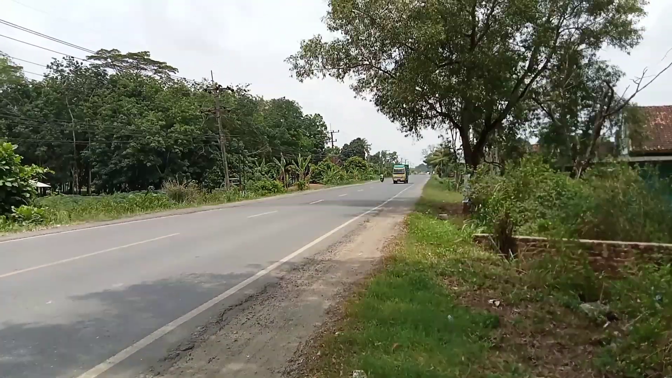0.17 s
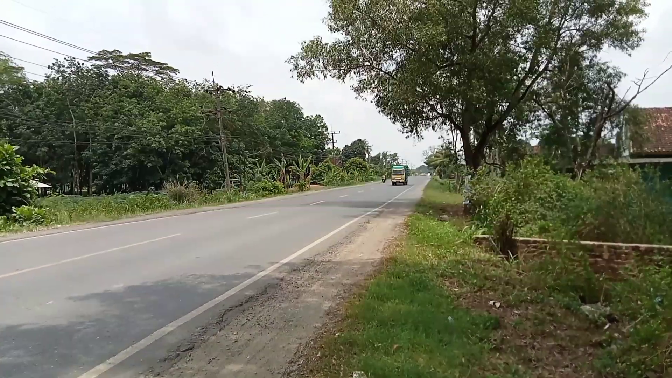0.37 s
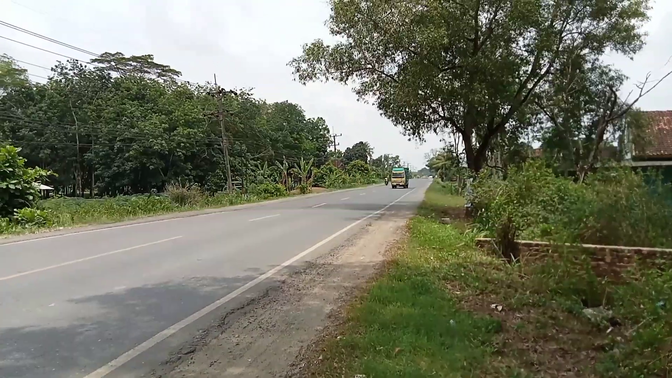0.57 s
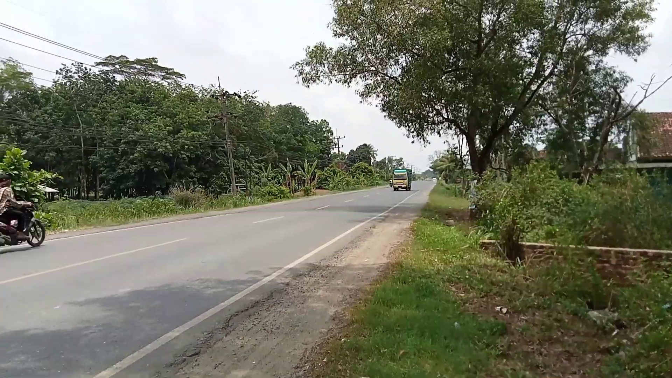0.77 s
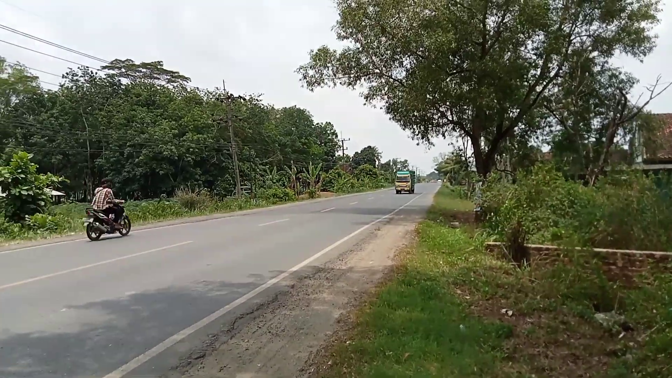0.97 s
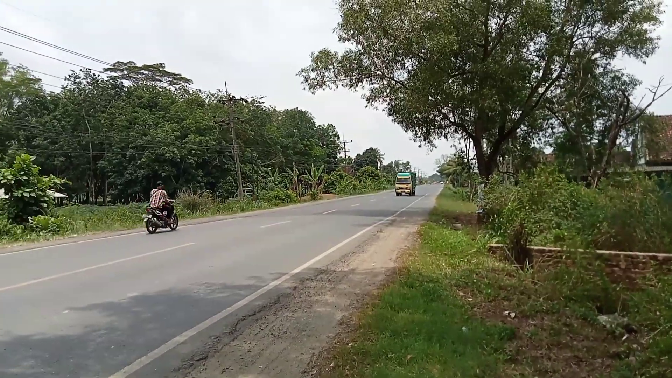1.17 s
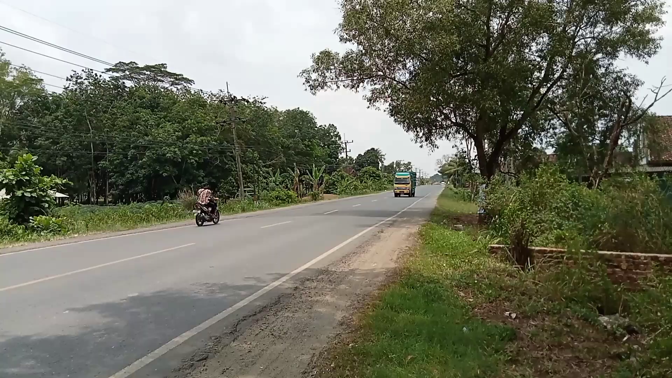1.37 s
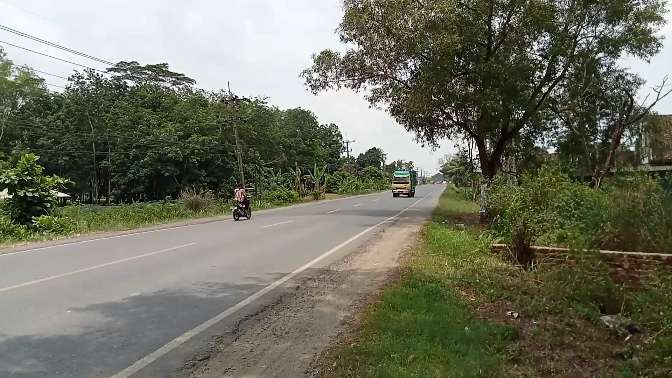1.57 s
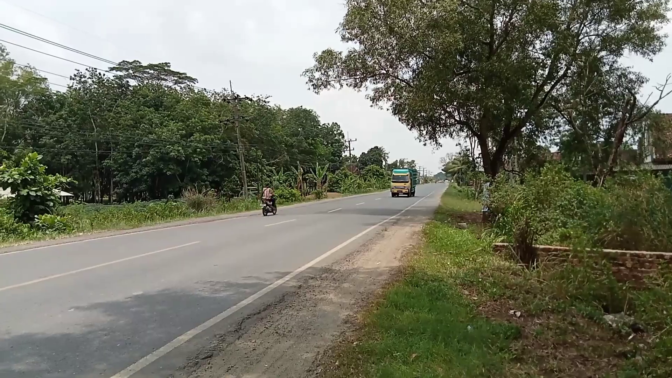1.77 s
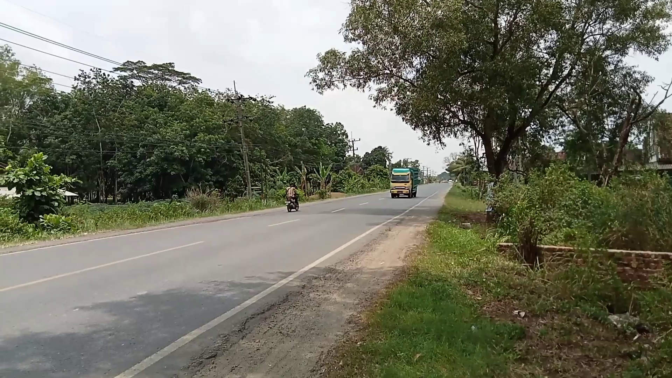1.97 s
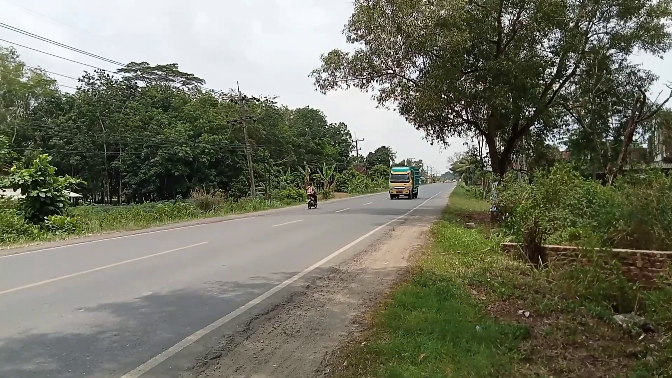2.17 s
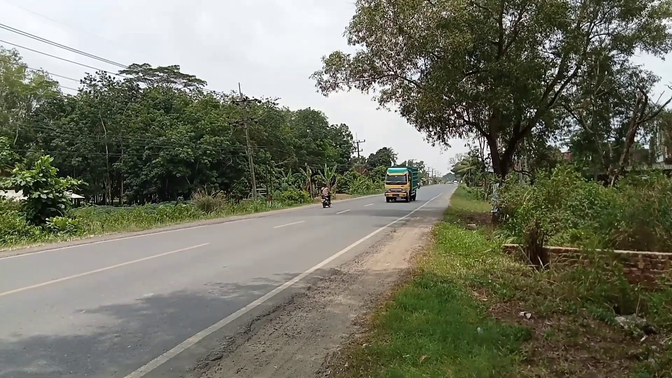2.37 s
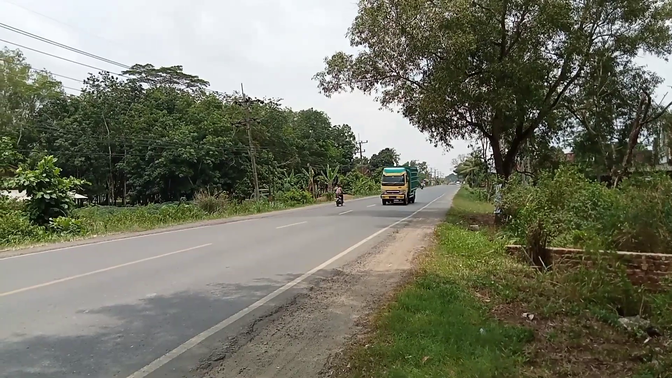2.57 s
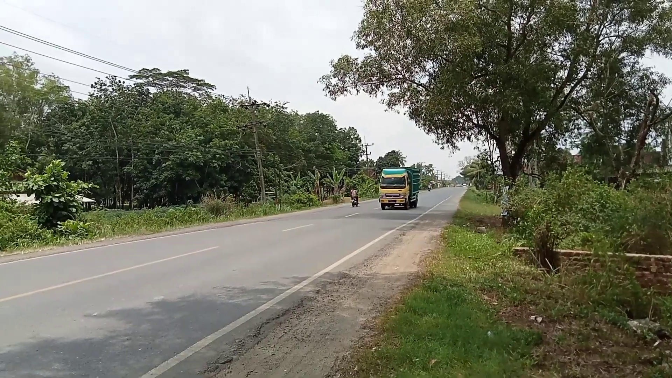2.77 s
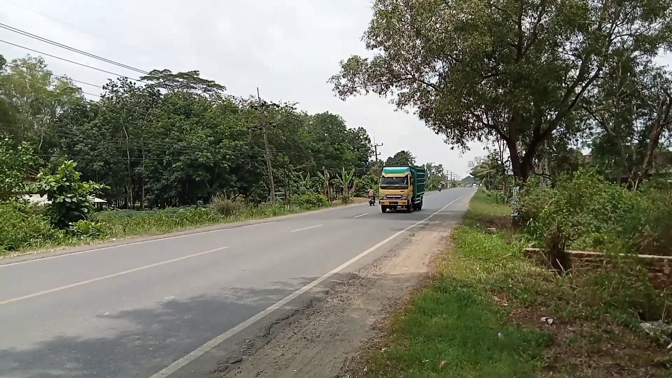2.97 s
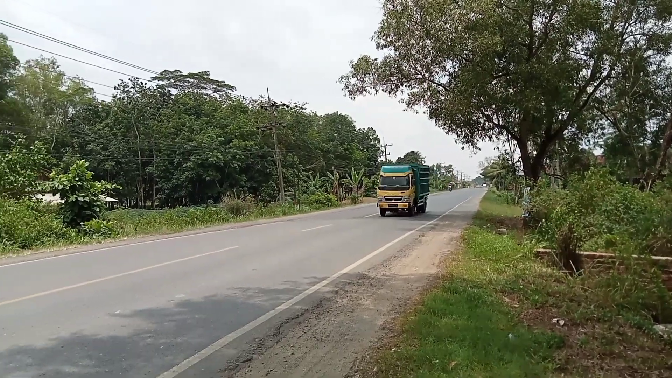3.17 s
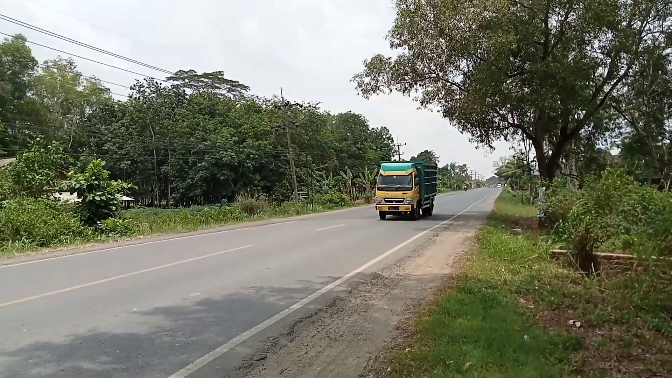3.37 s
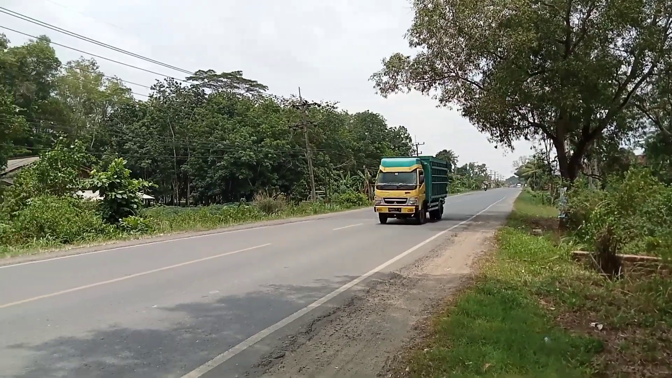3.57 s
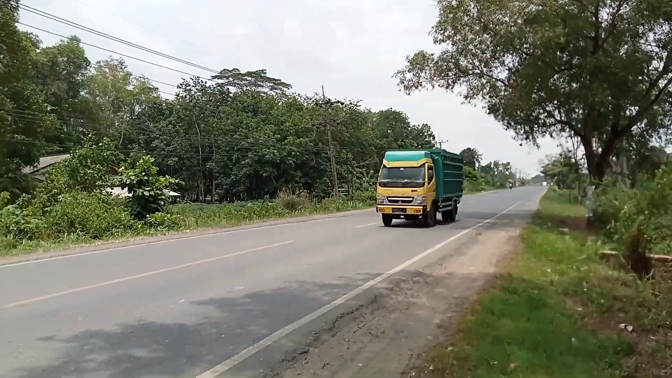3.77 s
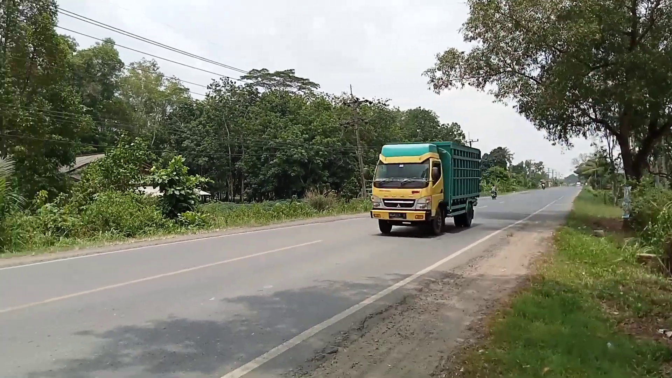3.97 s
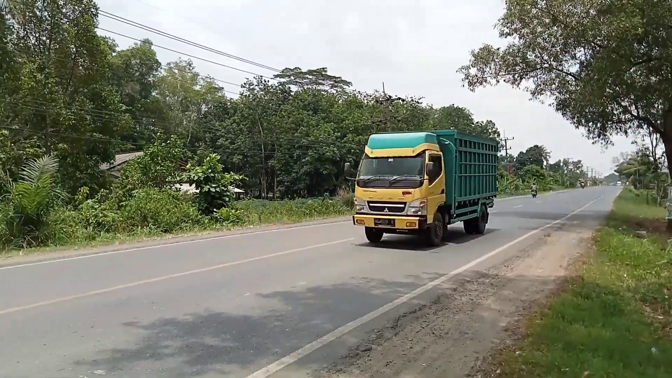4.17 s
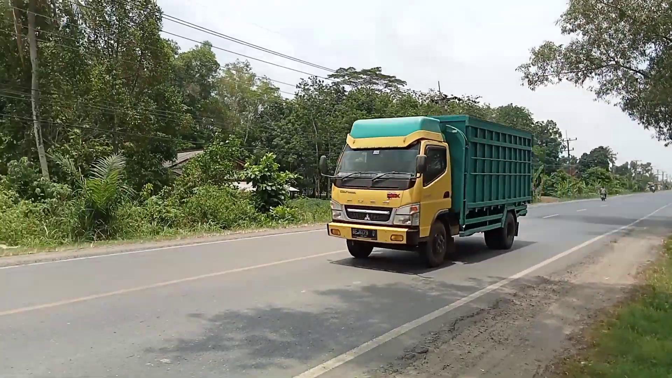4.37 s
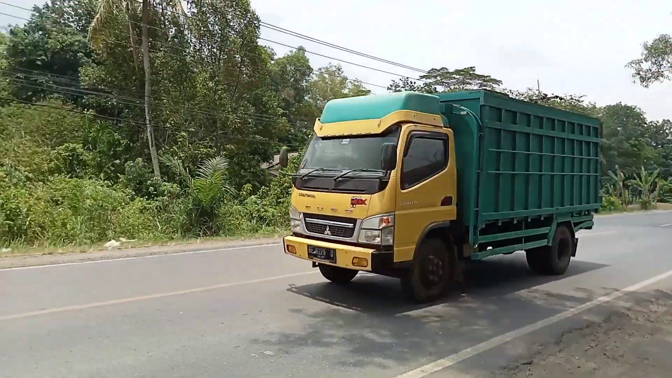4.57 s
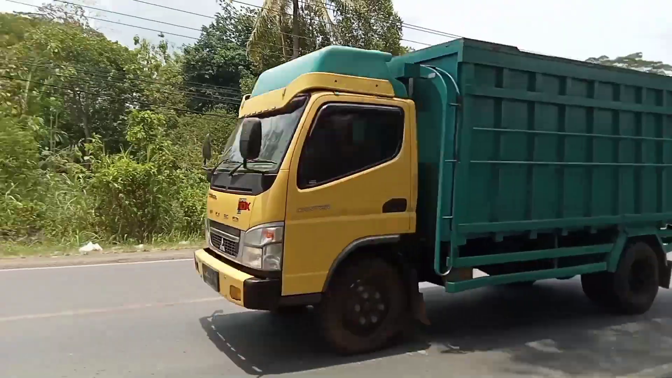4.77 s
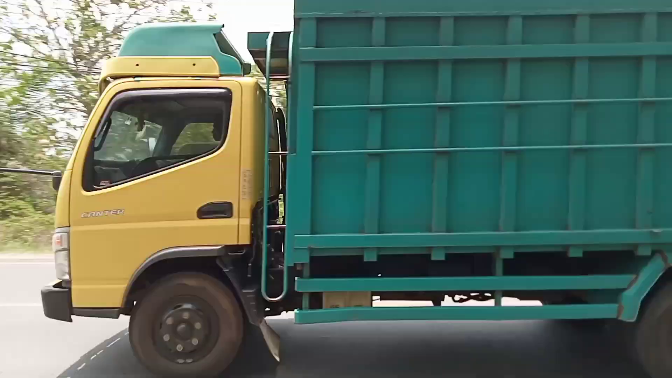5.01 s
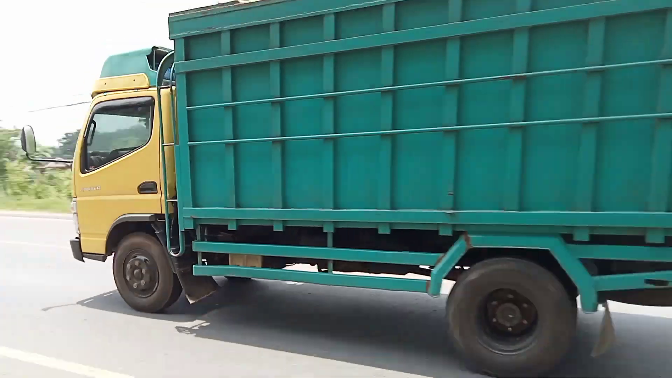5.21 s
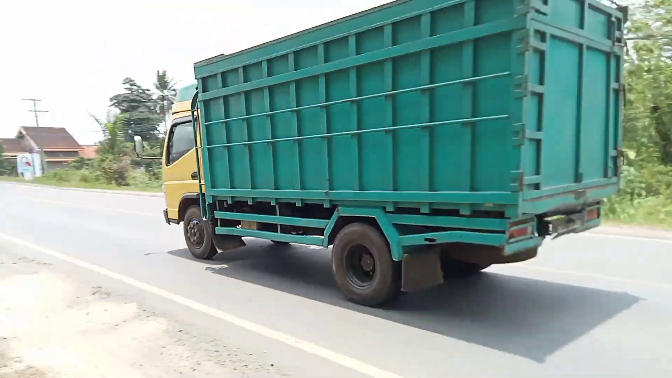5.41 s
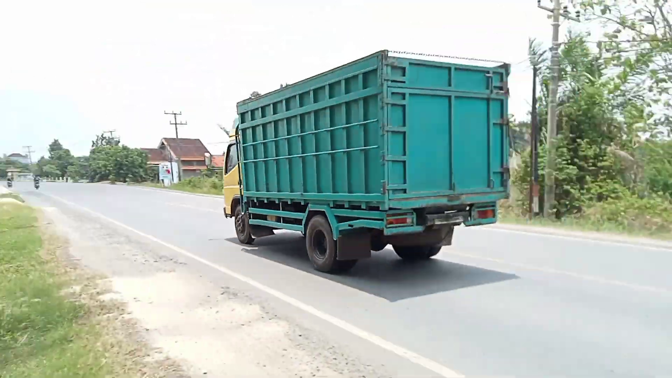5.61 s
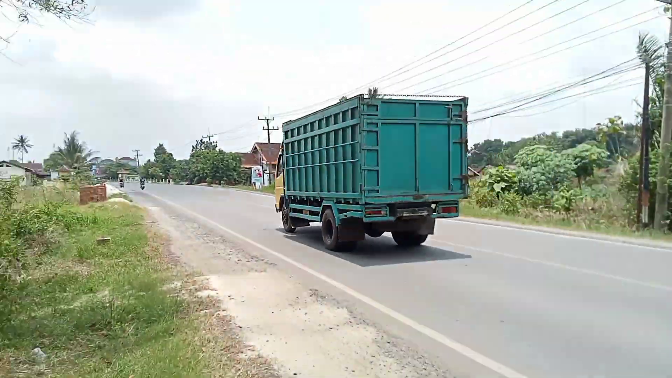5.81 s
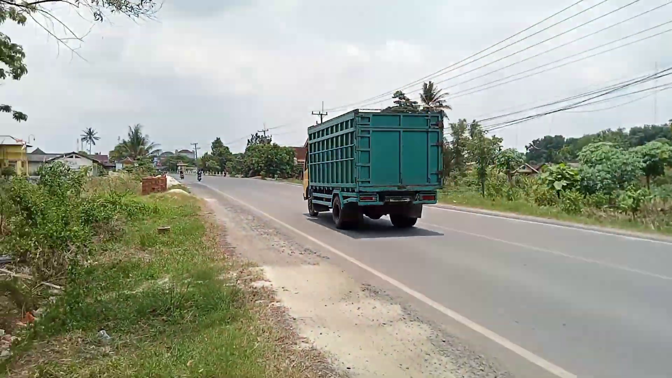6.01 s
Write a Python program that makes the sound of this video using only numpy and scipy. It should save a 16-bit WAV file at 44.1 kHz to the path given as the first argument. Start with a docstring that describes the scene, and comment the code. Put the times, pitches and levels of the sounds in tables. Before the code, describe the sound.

Open rural roadside, heard through a small handheld microphone. A thin, loud scrap of traffic noise sinks and cuts out before 0.1 s; after a tiny silence, sound fades smoothly back by about 0.4 s. Motorbikes are then close and going away, one humming, one raspy and fluttering, thinning over the next two seconds. Distant truck rumble lies beneath. Around 2.1-2.26 s a bird gives one quick, high, arched chirp. Faint thin ticks and dull thumps occur at 1.7-1.9 s and between 3.3 and 4.8 s. From 3 s the light diesel truck builds: low pulsing engine, grainy tyre roar, bright clatter. It surges past at about 5.2 s, full and hissy, with a sharper tick and thump at 5.26 s, another tick at 5.37 s. Its pitch dips and it fades, still audible, until 6 s. Reflections give a sliding, hollow colour.

```python
"""Country roadside pass-by

Motorbikes recede while a light diesel truck approaches, passes close and drives off.
Engines are sines and pulsing noise paced by the firings; tyres and road are shaped noise.
A close reflection off the listener's body combs the traffic, its lag shifting as the sources pass.
A bird chirps once, small things tick and thump; just after the start the sound drops out and fades back in."""
import sys
import numpy as np
from scipy import signal
from scipy.fft import rfft, irfft
from scipy.io import wavfile
from scipy.ndimage import uniform_filter1d, map_coordinates

SR = 44100
rng = np.random.default_rng(int(sys.argv[2]) if len(sys.argv) > 2 else 0)


def unload_audio(sound):
    """Save the sound as a 16-bit wav file, at the path given as the first command line argument."""
    columns = np.transpose(np.atleast_2d(sound))
    # keep every value between -1 and 1, then stretch to whole-number steps
    steps = np.round(np.clip(columns, -1, 1) * 32767)
    wavfile.write(sys.argv[1], SR, steps.astype(np.int16))


N = 266805

SOUND_M_PER_S = 343
TRUCK_M_PER_S, TRUCK_LANE_M, TRUCK_PASSES_S = 16, 4.8, 5.2
HISS_FIRINGS_HZ = 57  # firing rate at which the truck's hiss is made, before its pitch is bent
BIKE_M_PER_S, BIKE_LANE_M, BIKE_FIRINGS_HZ = 14, 5.0, 34
RASPY_M_PER_S, RASPY_LANE_M, RASPY_PASSES_S, RASPY_FIRINGS_HZ = 14, 5.0, .5, 40.7

# Truck engine speed. Each row: time in seconds, firings per second.
TRUCK_FIRINGS = [(0.3, 54.2), (3.6, 57.2), (6.05, 56.8)]
# Low engine tone near 58 Hz, perhaps from another vehicle at first, swelling as the truck passes.
# Each row: time in seconds, level in dB.
LOW_ENGINE_TONE = [(0.3, -55), (2.0, -49.5), (2.7, -52), (3.1, -57), (3.9, -62), (4.2, -51), (4.9, -52),
                   (5.3, -40), (5.55, -49), (6.05, -55)]

# Engine orders of the truck, the humming bike and the raspy bike.
# Each row: multiple of the firing rate, dB over the level of the rumble (truck) or tone (bikes).
DIESEL_ORDERS = [(2, -19), (3, -14), (4, -17), (6, -15)]
BIKE_ORDERS = [(2, -6), (3, -10), (4, -3), (5, 0), (6, 0), (7, -1), (8, -5), (9, -7)]
RASPY_ORDERS = [(1, -12), (2, -6), (4, 0)]

# Moving parts of the truck. Each row: abreast at seconds, level there in dB, dB lost per doubling of
# distance, dB louder ahead than behind, air and ground loss in dB per m, level of far traffic in dB.
TRUCK_RUMBLE = (5.2, -27, 7.5, -0.1, .001, -47.5)
TRUCK_TYRES = (5.13, -22.5, 6.5, 3.5, .06, -47)
TRUCK_CLATTER = (5.02, -28.5, 9.5, 8.0, .05, -48)
TRUCK_FLANK = (5.19, -23.5, 8.0, -6.0, .1, -56)
TRUCK_HISS = (5.13, -33.5, 9.0, 0.1, .001, -61)
# Moving parts of the humming bike, then the raspy bike. Each row: abreast at seconds, level there in dB,
# dB lost per doubling, dB louder ahead than behind, loss in dB per m, level of far traffic in dB.
BIKE_TONE = (0.3, -49, 4.5, -5.0, .05, -75)
RASPY_TONE = (.35, -51, 5.0, -5.0, .1, -75)
RASPY_RASP = (.5, -31, 1.0, -1.5, .5, -60)
RASPY_ROAD = (.47, -31, 8.0, 6.0, .2, -75)
RASPY_HISS = (.6, -40, 8.5, -1.0, .001, -58)

# Noise colours of the truck, then the raspy bike. Each row: frequency in Hz, relative density in dB.
RUMBLE_COLOUR = [(30, -24), (50, -8), (90, -3), (160, -8), (330, -1), (600, -9.5), (1200, -41)]
TYRE_COLOUR = [(200, -14.5), (450, -1), (620, -3), (740, -1.5), (950, -4), (1400, -4), (2200, -7),
               (4000, -48)]
CLATTER_COLOUR = [(900, -34), (1700, 6.5), (2000, -5), (2500, -5), (3250, 2.5), (3700, -6.5), (4500, -23.5),
                  (7000, -31.5)]
FLANK_COLOUR = [(900, -32), (1400, -2.5), (2000, -2.5), (2500, 1.5), (3000, -2.5), (3700, -7), (4600, -14),
                (5500, -31), (8000, -50)]
HISS_COLOUR = [(2500, -4.5), (4500, -2.5), (5500, 1), (7000, 2), (8000, -2.5), (9500, -4.5), (11000, -7),
               (15500, -11)]
RASP_COLOUR = [(200, -14), (700, -10.5), (1180, -13.5), (1320, -1), (1480, -8), (2000, -5.5), (2350, 1),
               (2650, -1), (3000, -12.5), (3700, -13.5), (4500, -18.5), (8000, -41)]
BIKE_ROAD_COLOUR = [(60, -10), (200, -9.5), (500, -5.5), (900, -5), (1200, -5.5), (2000, -2), (2700, 0),
                    (3500, -4.5), (4300, -6.5), (5000, -24), (8000, -46)]
BIKE_HISS_COLOUR = [(2500, -29), (4500, -8.5), (5300, -3), (6200, 3.5), (7800, -2), (9000, 1.5),
                    (11000, -6), (15500, -6)]

# The chirp's fundamental peaks here and falls off as a parabola on either side.
BIRD_TOP_S, BIRD_TOP_HZ = 2.165, 1735
BIRD_RISE_HZ_PER_S2, BIRD_FALL_HZ_PER_S2 = 30000, 16000
# Bird's syllables. Each row: start in seconds, length in seconds, third partial in dB, fourth partial in dB.
BIRD_NOTES = [(2.1, .04, -53, -58), (2.135, .055, -50, -50), (2.187, .038, -50, -53),
              (2.222, .042, -53, -62)]
# Thin ticks. Each row: start in seconds, peak in dB, centre in Hz.
TICKS = [(1.915, -35.5, 13000), (3.2845, -43.5, 14200), (3.7485, -46.5, 13100), (3.761, -49.5, 13500),
         (3.9156, -39.5, 14700), (4.075, -42.5, 14800), (4.385, -27.5, 13700), (4.398, -31, 11200),
         (4.5596, -30.5, 13000), (4.7782, -40.5, 13300), (5.258, -19.5, 12500), (5.37, -23.5, 9700)]
# Dull thumps. Each row: start in seconds, peak in dB, pitch in Hz.
THUMPS = [(1.727, -29.5, 120), (3.399, -28.5, 175), (3.847, -30.5, 146), (5.259, -16, 128)]

BODY_LEAD_TURNS, BODY_DULL_HZ, BODY_BRIGHT_HZ = .22, 1920, 4000
# Body reflection by source position. Each row: lag in ms far ahead, lag in ms far past, ms shorter abreast,
# strength in dB at no distance, loss in dB per m, treble share far off, treble share abreast.
BODY_TRUCK = (1.65, 1.77, .27, -2.0, .03, .95, .06)
BODY_BIKES = (.9, 1.75, .1, -10, .01, .2, .21)
# Bounce off the hand. Each row: time in seconds, lag in ms, strength in dB.
HAND = [(0.3, .39, -9), (1.5, .46, -20), (3.0, .37, -15), (4.4, .46, -16), (5.2, .43, -12.5),
        (6.05, .5, -20)]

# Microphone port resonance. Each row: centre in Hz, width in Hz, boost in dB.
MIC_PEAKS = [(8950, 970, 5.5)]
MIC_LOW_HZ, TOP_CUT_HZ = 47.3, 15480
OPENING_DB, OPENING_DB_PER_S, OPENING_BASS_CUT_HZ = 13, -165, 350
CUT_S, CUT_DB, CUT_DB_PER_S = .057, -27, -1800
RETURN_S, FADE_IN_S = .142, .105


def truck():
    """Light diesel: sines on the firing orders, noise pulsed by the firings, and steadier tyre and flank noise."""
    firing = in_time(TRUCK_FIRINGS)[0] * doppler(TRUCK_PASSES_S, TRUCK_M_PER_S, TRUCK_LANE_M)
    turns = np.cumsum(firing) / SR
    rumble_db, tyre_db, clatter_db, flank_db, hiss_db = (
        part_db(part, TRUCK_M_PER_S, TRUCK_LANE_M)
        for part in (TRUCK_RUMBLE, TRUCK_TYRES, TRUCK_CLATTER, TRUCK_FLANK, TRUCK_HISS))

    low_tone_db = in_time(LOW_ENGINE_TONE)[0]
    tones = from_db(low_tone_db) * orders(turns, [(1, 0)], waver_db=3.0)
    tones += from_db(rumble_db) * orders(turns, DIESEL_ORDERS, waver_db=3.0)
    rumble = coloured(fired_noise(turns, depth=.17, spread_db=3.5, gust_db=1.2), RUMBLE_COLOUR)
    roar = coloured(from_db(0.8 * drift(24)) * rng.standard_normal(N), TYRE_COLOUR)
    clatter = coloured(fired_noise(turns, depth=0.1, spread_db=3.0, gust_db=0.83), CLATTER_COLOUR)
    flank = coloured(from_db(0.4 * drift(18)) * rng.standard_normal(N), FLANK_COLOUR)

    # made at a steady pace, then read at the engine's Doppler-shifted pace so its whole colour shifts
    steady_turns = np.arange(N) * HISS_FIRINGS_HZ / SR
    hiss = coloured(fired_noise(steady_turns, depth=0.11, spread_db=5.5, gust_db=0.5), HISS_COLOUR)
    hiss = read_at(hiss, turns / HISS_FIRINGS_HZ * SR)
    # air takes the top off the hiss while the truck is far and faint
    top = hiss - signal.sosfiltfilt(signal.butter(2, 10500, fs=SR, output="sos"), hiss)
    hiss = hiss - top * np.clip((-41 - hiss_db) / 28, 0, 1)

    return (tones + from_db(rumble_db) * rumble + from_db(tyre_db) * roar
            + from_db(clatter_db) * clatter + from_db(flank_db) * flank + from_db(hiss_db) * hiss)


def bikes():
    """One bike hums on Doppler-shifted exhaust orders; the other adds firing-pulsed noise at a steady pitch."""
    firing = BIKE_FIRINGS_HZ * doppler(BIKE_TONE[0], BIKE_M_PER_S, BIKE_LANE_M)
    hum_db = part_db(BIKE_TONE, BIKE_M_PER_S, BIKE_LANE_M)
    hum = from_db(hum_db) * orders(np.cumsum(firing) / SR, BIKE_ORDERS, waver_db=1.8)

    tone_db, rasp_db, road_db, hiss_db = (
        part_db(part, RASPY_M_PER_S, RASPY_LANE_M)
        for part in (RASPY_TONE, RASPY_RASP, RASPY_ROAD, RASPY_HISS))
    turns = np.arange(N) * RASPY_FIRINGS_HZ / SR
    tones = orders(turns, RASPY_ORDERS, waver_db=4.0)
    rasp = coloured(fired_noise(turns, depth=0.12, spread_db=0.0, gust_db=1.7), RASP_COLOUR)
    road = coloured(fired_noise(turns, depth=0.06, spread_db=4.5, gust_db=1.0), BIKE_ROAD_COLOUR)
    hiss = coloured(fired_noise(turns, depth=.08, spread_db=3.0, gust_db=.4), BIKE_HISS_COLOUR)
    return (hum + from_db(tone_db) * tones + from_db(rasp_db) * rasp
            + from_db(road_db) * road + from_db(hiss_db) * hiss)


def orders(turns, table, waver_db):
    """Sines on multiples of a slightly uneven turning phase, each wavering on its own around its level."""
    uneven = turns + .018 * drift(7)
    total = 0
    for multiple, db in table:
        level = np.sqrt(2) * from_db(db + waver_db * drift(4.7))
        total = total + level * np.sin(2 * np.pi * (multiple * uneven + rng.random()))
    return total


def fired_noise(turns, depth, spread_db, gust_db):
    """Noise that bursts at each firing and decays within the cycle; every firing has its own strength."""
    each_firing = from_db(spread_db * rng.standard_normal(int(turns[-1]) + 1))
    strength = each_firing[turns.astype(int)]
    burst = 1 - depth + depth * 3 * strength * np.exp(-3.5 * (turns % 1))
    return burst * from_db(gust_db * drift(9.1)) * rng.standard_normal(N)


def passing(abreast_s, m_per_s, lane_m):
    """Straight drive-by: distance in m, and heading from 1 (coming) through 0 (abreast) to -1 (going)."""
    along = m_per_s * (abreast_s - np.arange(N) / SR)
    distance = np.hypot(along, lane_m)
    return distance, along / distance


def part_db(part, m_per_s, lane_m):
    """Level of a moving part from spreading, direction and loss on the way, over far traffic of its kind."""
    abreast_s, level_db, doubling_db, ahead_db, loss_db, far_db = part
    distance, heading = passing(abreast_s, m_per_s, lane_m)
    own_db = level_db - doubling_db * np.log2(distance / lane_m)
    own_db = own_db + ahead_db * heading / 2 - loss_db * (distance - lane_m)
    return 20 * np.log10(np.hypot(from_db(own_db), from_db(far_db)))


def doppler(abreast_s, m_per_s, lane_m):
    """Pitch factor of a passing source: above 1 coming, below 1 going."""
    heading = passing(abreast_s, m_per_s, lane_m)[1]
    return 1 / (1 - heading * m_per_s / SOUND_M_PER_S)


def body_rule(rule, abreast_s, m_per_s, lane_m):
    """Lag, strength and treble share of the body's echo follow the source's bearing and distance."""
    ahead_ms, past_ms, abreast_ms, strength_db, loss_db, far_share, near_share = rule
    distance, heading = passing(abreast_s, m_per_s, lane_m)
    near = (lane_m / distance) ** 1.5
    lag_ms = past_ms + (ahead_ms - past_ms) * (1 + heading) / 2 - abreast_ms * near
    share = far_share + (near_share - far_share) * near
    return lag_ms, strength_db - loss_db * distance, share


def body_echo(x, lag_ms, strength_db, share):
    """A late copy, phase turned ahead by diffraction, combs the sound; less treble share blurs upper notches."""
    hz = np.arange(N // 2 + 1) * SR / N
    turned = rfft(x) * np.exp(2j * np.pi * BODY_LEAD_TURNS)
    dull = irfft(turned / (1 + (hz / BODY_DULL_HZ) ** 4), N)
    bright = irfft(turned / (1 + (hz / BODY_BRIGHT_HZ) ** 4), N)
    echo = dull + np.clip(share, 0, 1) * (bright - dull)
    return x + from_db(strength_db) * read_at(echo, np.arange(N) - lag_ms * SR / 1000)


def hand_echo(x):
    """The hand throws back mostly treble after a fraction of a millisecond, combing the top."""
    lag_ms, strength_db = in_time(HAND)
    treble = signal.sosfilt(signal.butter(1, 3000, "high", fs=SR, output="sos"), x)
    return x + from_db(strength_db) * read_at(treble, np.arange(N) - lag_ms * SR / 1000)


def turbulence(x, depth_db, span_s, span_hz):
    """Moving air and scattered paths make patches of the spectrum swell and sink on their own."""
    hz, s, parts = signal.stft(x, SR, nperseg=512)
    field = rng.standard_normal(parts.shape)
    for axis, width in ((0, span_hz / hz[1]), (1, span_s / (s[1] - s[0]))):
        for _ in range(2):  # smoothing twice rounds the patches
            field = uniform_filter1d(field, max(round(width), 1), axis=axis)
    return signal.istft(parts * from_db(depth_db * rms_one(field)), SR, nperseg=512)[1][:N]


def bird():
    """One arched chirp broken into syllables, heard on its third and fourth partials, each fluttering."""
    t = np.arange(N) / SR
    bend = np.where(t < BIRD_TOP_S, BIRD_RISE_HZ_PER_S2, BIRD_FALL_HZ_PER_S2) * (t - BIRD_TOP_S) ** 2
    turns = np.cumsum(np.maximum(BIRD_TOP_HZ - bend, 0)) / SR
    third, fourth = (np.sqrt(2) * from_db(3.5 * drift(45)) * np.sin(2 * np.pi * k * turns) for k in (3, 4))
    out = np.zeros(N)
    for s, length, third_db, fourth_db in BIRD_NOTES:
        swell = np.sin(np.pi * np.clip((t - s) / length, 0, 1)) ** .7
        out += swell * (from_db(third_db) * third + from_db(fourth_db) * fourth)
    return out


def small_hits():
    """Ticks are milliseconds of high noise; thumps are a few cycles of a low ring."""
    out, t = np.zeros(N + 4000), np.arange(4000) / SR
    for s, db, hz in TICKS:
        puff = rng.standard_normal(len(t)) * np.exp(-t / .0012)
        band = signal.butter(2, [hz / 1.08, hz * 1.12], "band", fs=SR, output="sos")
        puff = signal.sosfilt(band, puff)
        out[round(s * SR):][:len(t)] += from_db(db) * puff / np.abs(puff).max()
    for s, db, hz in THUMPS:
        rise = t / 0.006  # the envelope peaks after 6 ms
        ring = rise * np.exp(1 - rise) * np.sin(2 * np.pi * hz * t)
        out[round(s * SR):][:len(t)] += from_db(db) * ring
    return out[:N]


def dropout(x):
    """A thin start that is loud and sinks, a steep cut to silence, then a smooth fade back in."""
    t = np.arange(N) / SR
    start_db = OPENING_DB + OPENING_DB_PER_S * t
    start_db = start_db + (t > CUT_S) * (CUT_DB + CUT_DB_PER_S * (t - CUT_S))
    thin = signal.sosfilt(signal.butter(1, OPENING_BASS_CUT_HZ, "high", fs=SR, output="sos"), x)
    fade_in = 1 - np.exp(-(np.maximum(t - RETURN_S, 0) / FADE_IN_S) ** 2)
    return from_db(start_db) * thin + fade_in * x


def from_db(db):
    """Decibels to gain."""
    return 10 ** (np.asarray(db) / 20)


def rms_one(x):
    """Scale to rms 1."""
    return x / np.sqrt(np.mean(x ** 2) + 1e-20)


def in_time(rows):
    """Each column after the first as a curve over all samples."""
    s, *columns = np.transpose(rows)
    return [np.interp(np.arange(N) / SR, s, c) for c in columns]


def drift(rate_hz):
    """Slow random wander of rms 1: noise through two equal low-pass poles, one value per 40 samples."""
    r = np.exp(-2 * np.pi * rate_hz * 40 / SR)
    noise = rng.standard_normal(N // 40 + 2002)
    slow = signal.lfilter([1], [1, -2 * r, r * r], noise)[2000:]  # skip the filter's settling
    return np.interp(np.arange(N) / 40, np.arange(len(slow)), rms_one(slow))


def coloured(x, spectrum):
    """Tilt a flat sound to this spectrum, drawn over log frequency; rms 1."""
    hz, db = np.transpose(spectrum)
    bins = np.arange(1, N // 2 + 2) * SR / N
    gain = from_db(np.interp(np.log(bins), np.log(hz), db))
    return rms_one(irfft(rfft(x) * gain, N))


def read_at(x, samples):
    """Read a sound at fractional sample positions, wrapping at the ends."""
    return map_coordinates(x, [samples], order=3, mode="wrap")


def scene():
    """Traffic arrives directly and off body and hand through moving air; bird and small hits stay dry."""
    truck_lags = body_rule(BODY_TRUCK, TRUCK_PASSES_S, TRUCK_M_PER_S, TRUCK_LANE_M)
    bike_lags = body_rule(BODY_BIKES, RASPY_PASSES_S, RASPY_M_PER_S, RASPY_LANE_M)
    traffic = body_echo(truck(), *truck_lags) + body_echo(bikes(), *bike_lags)
    traffic = turbulence(hand_echo(traffic), depth_db=1.4, span_s=.12, span_hz=200)
    return (traffic + bird() + small_hits())[None]


def record(dry):
    """Microphone port resonance and bass cut, the drop-out, then a steep top cut."""
    for hz, width, db in MIC_PEAKS:
        dry = dry + (from_db(db) - 1) * signal.lfilter(*signal.iirpeak(hz, hz / width, SR), dry)
    dry = signal.sosfilt(signal.butter(3, MIC_LOW_HZ, "high", fs=SR, output="sos"), dry)
    dry = dropout(dry)
    return signal.sosfilt(signal.ellip(12, .5, 70, TOP_CUT_HZ, fs=SR, output="sos"), dry)


dry = scene()
out = record(dry)
unload_audio(out)
```